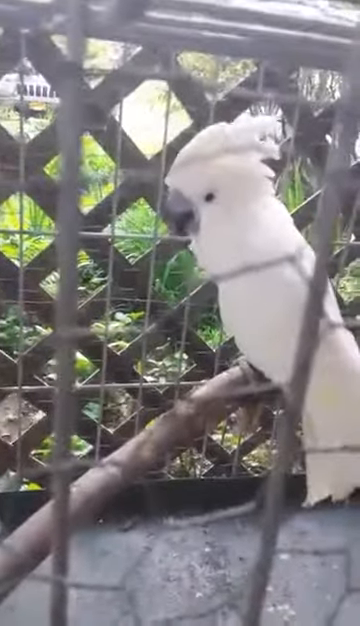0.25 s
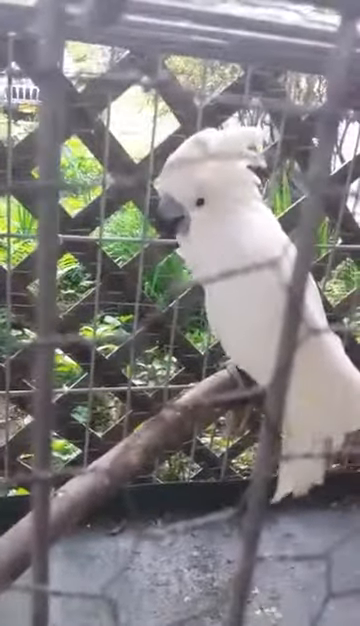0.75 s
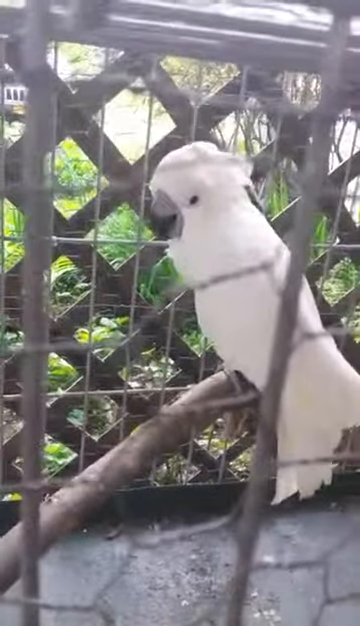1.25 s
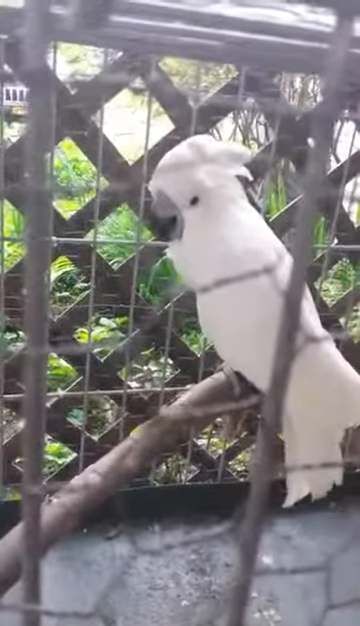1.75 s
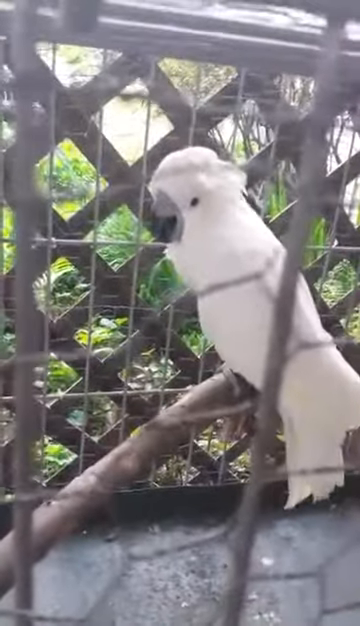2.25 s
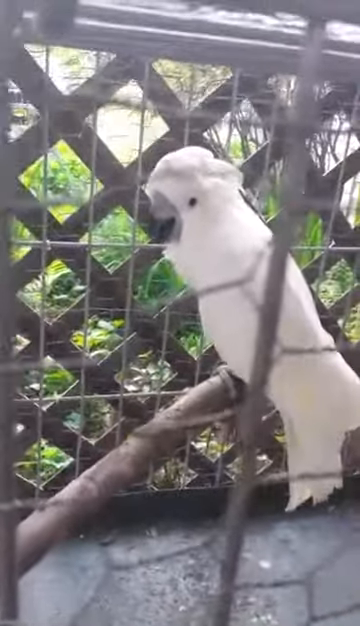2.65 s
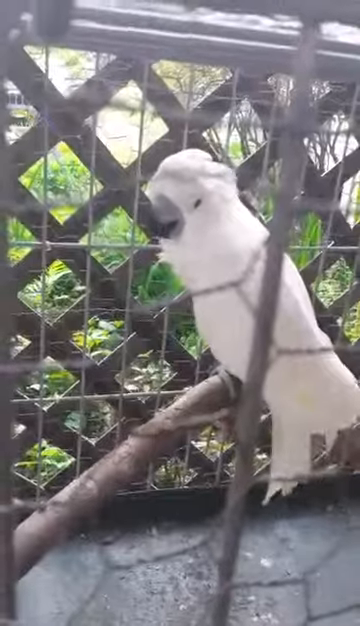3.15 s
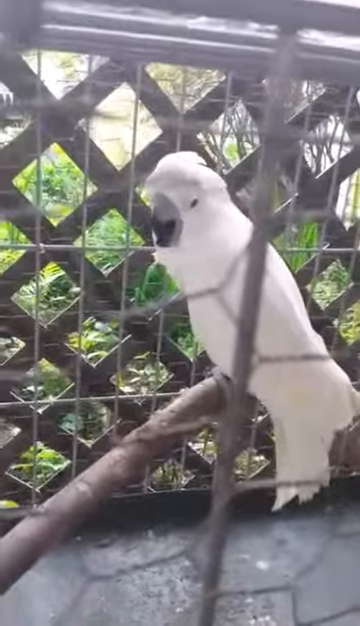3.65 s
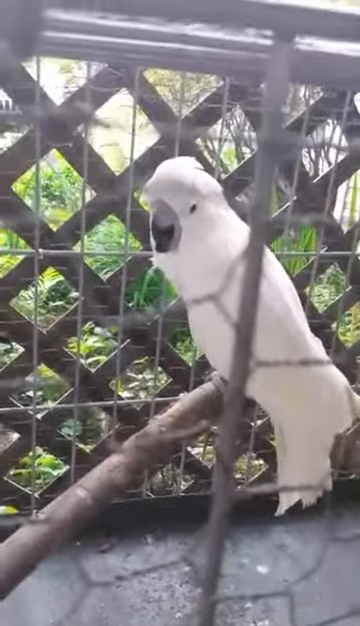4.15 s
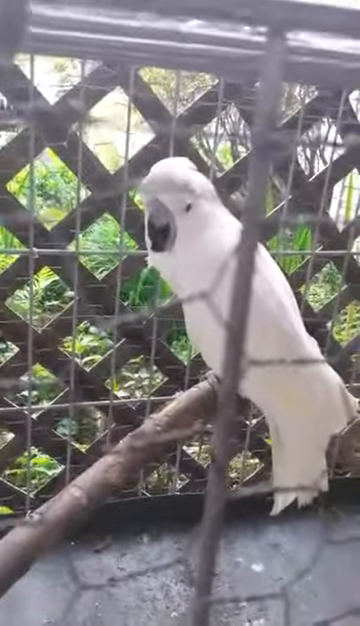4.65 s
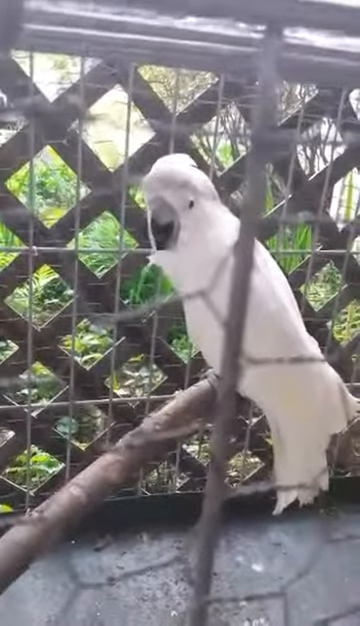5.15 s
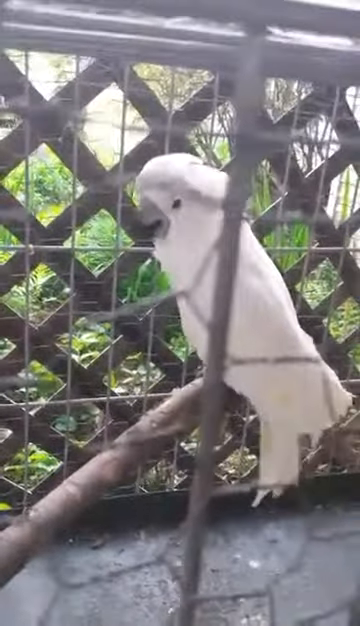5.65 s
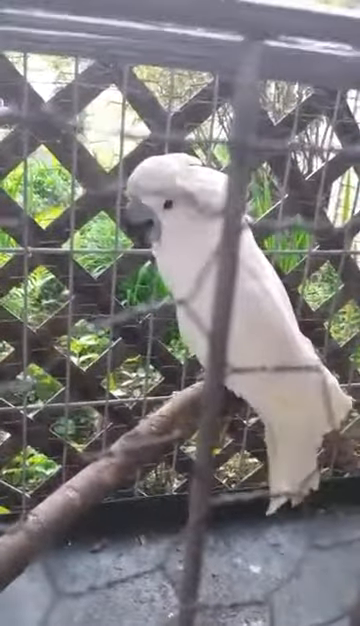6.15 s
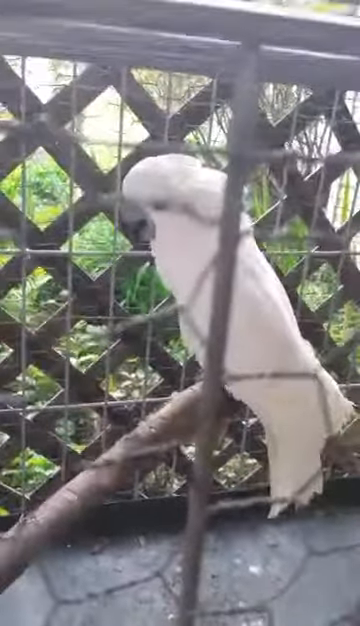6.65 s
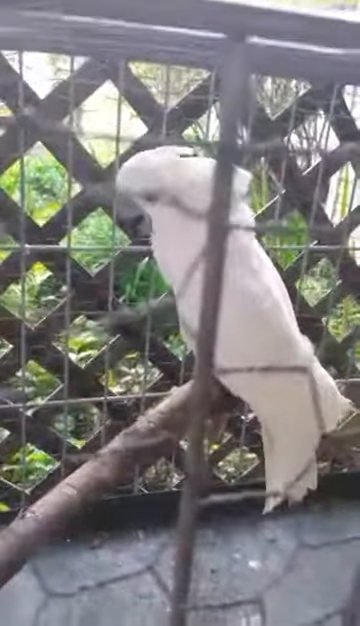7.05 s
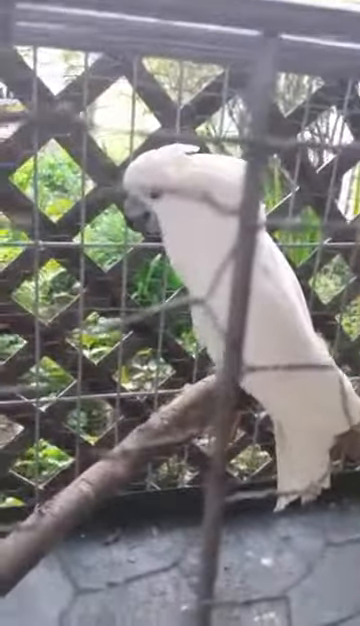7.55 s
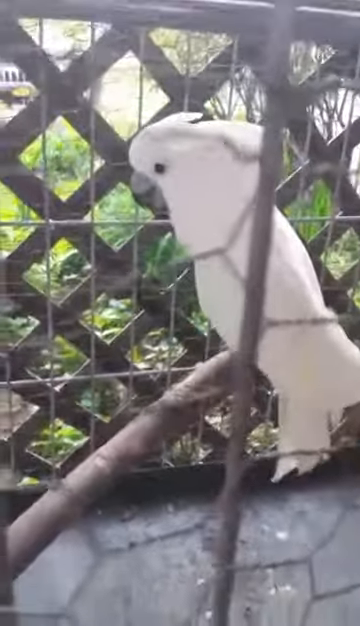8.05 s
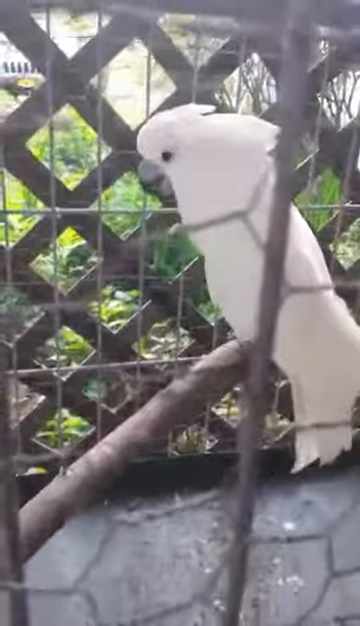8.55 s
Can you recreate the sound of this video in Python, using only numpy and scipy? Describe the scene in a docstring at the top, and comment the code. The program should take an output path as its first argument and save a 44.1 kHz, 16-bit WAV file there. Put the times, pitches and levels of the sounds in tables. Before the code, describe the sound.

Very loud, close cockatoo screeches, some long and wavering, break into rough rasp outdoors; faint bird whistles and low rumble fill the short gaps.

```python
"""Cockatoo in an outdoor aviary

A cockatoo screeches five long calls close to a phone with two unlike microphone ports.
Its syrinx flips between a clear stack of partials and a chaotic train of pulses, both shaped by the throat.
Lattice, roof and walls answer briefly with decaying noise. In the pauses small birds whistle far off,
as gliding sines, and the beak ticks once; filtered noise makes a low outdoor rumble and a faint hiss."""
import sys
import numpy as np
from scipy import signal
from scipy.fft import rfft, irfft, next_fast_len
from scipy.io import wavfile
from scipy.ndimage import uniform_filter1d, minimum_filter1d, map_coordinates

SR = 44100
rng = np.random.default_rng(int(sys.argv[2]) if len(sys.argv) > 2 else 0)


def wav_record(signal):
    """Record a signal, one row per channel, as 16-bit PCM in the file named by sys.argv[1]."""
    frames = np.transpose(np.atleast_2d(signal))
    bounded = np.clip(frames, -1, 1)
    # unit amplitude maps onto the largest positive 16-bit level
    quanta = np.round(bounded * 32767).astype(np.int16)
    wavfile.write(sys.argv[1], SR, quanta)


N = 388080  # samples

# Level of the outdoor rumble, ahead of the port balance. Each row: time in seconds, level in dB.
RUMBLE_LEVEL = [(0.0, -56.5), (4.07, -59), (4.97, -70), (5.02, -58), (7.97, -55), (8.04, -79), (8.7, -98),
                (8.8, -74.5)]
# Spectrum of the rumble. Each row: frequency in Hz, relative density in dB per Hz.
RUMBLE_SPECTRUM = [(15, -48.5), (25, -3), (49, 17), (81, -4), (155, 7.5), (390, -15.5), (461, -10),
                   (700, -9.5), (910, -64.5), (1540, -120)]
# Leaves and far noise, ahead of the ports. Each row: frequency in Hz, relative density in dB per Hz.
AIR_SPECTRUM = [(500, 4), (1000, -14), (2000, -2), (4000, -5.5), (6500, -10.5), (9000, -7.5),
                (12000, -28.5), (14500, -27.5)]
# Far whistles. Each row: start in seconds, length in seconds, first pitch in Hz, last pitch in Hz,
# left level in dB ahead of the flutter, left over right in dB.
FAR_WHISTLES = [(2.99, .11, 4355, 3955, -59, 23), (3.13, .09, 5440, 5183, -68, 27),
                (5.47, .19, 5320, 5270, -57, 13), (5.65, .09, 5136, 5830, -66.5, -7),
                (5.5, .05, 4260, 4100, -70, -7), (5.53, .16, 3660, 2717, -59.5, 5)]
# Decay of the yard. Each row: frequency in Hz, time to fall 60 dB in seconds.
YARD_DECAY = [(500, 0.52), (1300, 0.26), (2500, 0.18), (6000, 0.25), (12000, 0.12)]
# Colour of the left microphone port. Each row: frequency in Hz, gain in dB.
LEFT_PORT_GAIN = [(300, -32.5), (680, 8), (1300, 3.3), (2000, -6), (4000, 1), (6800, 7), (7600, -6),
                  (8500, -16), (11000, -25), (14500, -7)]
# Colour of the right microphone port. Each row: frequency in Hz, gain in dB.
RIGHT_PORT_GAIN = [(300, -24), (700, 1), (1300, -3), (2500, -17.5), (4000, -10.5), (6000, -5), (7400, 0),
                   (9000, -5), (14500, -2)]
# Ticks of the beak as it opens. Each row: time in seconds, left level in dB.
BEAK_TICKS = [(3.24, -51.5)]
# Resonances of windpipe and open beak. Each row: frequency in Hz, width in Hz, gain in dB.
THROAT_MODES = [(1268, 218, 3.5), (2427, 236, 8.5), (3457, 674, 1), (5143, 560, 2.5), (6153, 518, -3.5),
                (7517, 345, -2.5), (8940, 960, -7.5), (11450, 2400, -21)]
# Windpipe modes that the rasp rings harder. Each row: frequency in Hz, width in Hz, gain in dB.
RASP_MODES = [(2276, 330, -5), (3610, 300, -10), (5450, 120, -8), (6660, 340, 3)]
# The held part of each call, one list a call. Each row: time in seconds, pitch in Hz, level in dB.
HELD_CALLS = [
    [(0, 641, -19), (.04, 647.8, -15.5), (.165, 653.6, -6.5), (.249, 643, -20), (.28, 593, -21),
     (.334, 604.3, -20.5), (.43, 623.4, -15.5), (.509, 648.4, -12.5), (.539, 620.6, -18)],
    [(.957, 572, -16.5), (.978, 573, -10.5), (1.073, 650, -22), (1.117, 640.5, -8), (1.172, 624, -17.5),
     (1.252, 649.7, -16), (1.37, 631, -19), (1.55, 646.8, -16.5), (1.746, 668.6, -13.5),
     (1.941, 649.9, -15), (1.98, 642, -14.5), (2.02, 617.7, -17), (2.1, 658, -16), (2.19, 667.3, -12.5),
     (2.31, 656.2, -17), (2.424, 652, -10.5), (2.535, 661, -11.5), (2.6, 635.3, -20.5), (2.714, 646.3, -16),
     (2.76, 644, -12.5), (2.878, 640, -19)],
    [(3.302, 594.4, -14.5), (3.352, 599, -6.5), (3.417, 648.5, -24), (3.447, 644.5, -12),
     (3.542, 661, -15.5), (3.712, 666.9, -15.5), (3.906, 653.5, -16.5), (4.136, 670.3, -13.5),
     (4.365, 657.1, -16), (4.415, 664, -15.5), (4.465, 671.5, -12.5), (4.515, 660.5, -13.5),
     (4.53, 638.4, -12), (4.58, 653.9, -8), (4.654, 635.2, -13), (4.75, 628.7, -20), (4.959, 624.3, -13.5),
     (5.063, 603.6, -21), (5.198, 646, -12), (5.253, 627.7, -19.5), (5.303, 608, -36),
     (5.333, 600.5, -31.5)],
    [(5.775, 627, -18), (5.817, 620.2, -6), (5.89, 603.3, -19), (5.966, 670, -1.5), (6.02, 650.7, -21.5),
     (6.066, 641, -19), (6.116, 618.5, -20), (6.266, 581.7, -18.5), (6.42, 643.4, -4), (6.55, 618.3, -17.5),
     (6.59, 625.2, -15.5), (6.67, 615, -17.5), (6.73, 629.3, -18), (6.8, 615.3, -11.5), (6.934, 574.7, -25),
     (7.04, 550, -32.5), (7.1, 615.7, -21), (7.189, 650.5, -6.5), (7.31, 613.5, -26), (7.498, 586.3, -18.5)],
    [(7.972, 583.3, -15.5), (8.02, 588, -15), (8.127, 597.6, -14), (8.35, 602, -17), (8.53, 591, -14),
     (8.8, 577, -18)],
]
# Stretches where the pattern repeats only every second or third cycle, adding partials between.
# Each row: start in seconds, end in seconds, period in cycles, swing of timing in cycles.
PERIOD_SPLITS = [(0.319, 0.416, 3, 0.021), (1.28, 1.37, 3, 0.017), (2.047, 2.128, 2, 0.018),
                 (2.149, 2.263, 3, 0.0045), (2.61, 2.715, 3, 0.022), (4.52, 4.56, 2, 0.016),
                 (4.61, 4.688, 2, 0.041), (5.872, 5.928, 2, 0.028), (6.05, 6.15, 2, 0.023),
                 (6.321, 6.43, 2, 0.0098)]
# Stretches of clearer voice. Each row: start in seconds, end in seconds,
# share of rasp in dB ahead of cracks and unsteadiness.
CLEAR_STRETCHES = [(.255, .32, -20), (.32, .37, -10), (.42, .53, -25), (1.17, 1.29, -17), (1.29, 1.37, -12),
                   (1.41, 1.46, -11), (1.54, 1.58, -22), (2.01, 2.065, -24), (2.065, 2.125, -17),
                   (2.16, 2.275, -22), (2.555, 2.585, -22), (2.62, 2.7, -7), (2.7, 2.75, -20),
                   (3.42, 3.455, -22), (4.54, 4.6, -24), (4.6, 4.68, -20), (4.68, 4.77, -8),
                   (5.865, 5.92, -11), (6.03, 6.15, -14), (6.32, 6.47, -9), (6.54, 6.59, -19),
                   (6.7, 6.77, -22), (1.58, 1.97, -36), (2.275, 2.555, -40), (2.75, 2.85, -35),
                   (3.455, 4.515, -38), (6.59, 6.7, -35)]
# Brief roughness in a clear note. Each row: time in seconds, half width in seconds, rise of rasp in dB.
VOICE_CRACKS = [(1.63, 0.024, 11), (1.825, 0.028, 23.5), (3.55, 0.027, 21), (3.8, 0.012, 15.5),
                (3.88, .02, 14.5), (4.24, 0.058, 21.5), (4.414, 0.013, 29)]
# Balance of the voice. Each row: time in seconds, share of the low tone in dB at the usual level,
# brightness (high over middle partials) in dB.
VOICE_BALANCE = [(0, -13, -5.5), (0.499, -11, -5), (.95, -11.5, 0), (1.3, -11.5, -7), (1.601, -10.5, -4.5),
                 (1.719, -9.5, 3.5), (2.031, -9.5, -6.5), (2.26, -11.5, 2.5), (2.42, -5, -5),
                 (2.531, -6, 8), (2.621, -10, -7), (2.76, -8.5, -2), (3.299, -12.5, -4.5),
                 (3.54, -12.5, 7.5), (3.9, -7.5, 4.5), (4.14, -12, -7), (4.36, -10, 1), (4.498, -12, -8),
                 (5.201, -15, -6.5), (5.801, -12.5, -3.5), (6.501, -12.5, -3.5), (6.619, -9.5, 2.5),
                 (7.04, -13.5, -4), (7.5, -12.5, -2), (7.95, -10.5, 2), (8.8, -12.5, 3.5)]

LEFT_LAG_S = 7 / SR
# A call swells from this far under its first level and pitch, then dies away.
ATTACK_S, ATTACK_DB, SCOOP_HZ = .04, -17.5, -25.5
RELEASE_S, RELEASE_DB = .09, -49
RASP_DB = -2.5  # usual share of rasp
FLIP_S = 0.0099  # time scale of a flip to the clear voice and back
UNSTEADY_DB = 4  # swing of the rasp share, smaller as rasp takes over
USUAL_DB = -15  # call level at which the low tone keeps its listed share
LOW_DROP = 0.55  # dB the low tone's share falls for each dB of call level over the usual
BAND_TOP_HZ = 14490


def amp(db):
    """Decibels to amplitude."""
    return 10 ** (np.asarray(db) / 20)


def unit(x):
    """Scale to an RMS of one over all channels together."""
    return x / np.sqrt(np.mean(x ** 2) + 1e-20)


def along(points, hz):
    """Read (Hz, value) points along a log frequency axis."""
    f, values = np.transpose(points)
    return np.interp(np.log(hz + 1), np.log(f + 1), values)


def over_time(points):
    """Join timed rows with straight lines: one curve for each column after the time."""
    times, *columns = np.transpose(points)
    return [np.interp(np.arange(N) / SR, times, column) for column in columns]


def wobble(rate, count=1):
    """Smooth random curves with `rate` knots a second."""
    coarse = np.arange(0, N + 64, 64)
    knots = rng.standard_normal((count, int(N * rate / SR) + 4))
    curves = [map_coordinates(row, [coarse * rate / SR]) for row in knots]
    return np.array([np.interp(np.arange(N), coarse, curve) for curve in curves])


def filtered(x, response):
    """Multiply the spectrum of x by a complex response of frequency."""
    size = next_fast_len(N + SR // 2)
    return irfft(rfft(x, size) * response(np.fft.rfftfreq(size, 1 / SR)), size)[..., :N]


def step(x, edge, width):
    """A smooth rise from 0 to 1, along frequency or time."""
    return .5 + .5 * np.tanh((x - edge) / width)


def resonance(f, centre_hz, width_hz, db):
    """One damped mode: a peak of the given gain, with its phase turn."""
    damping = 1j * f * width_hz
    return amp(db) * damping / (centre_hz ** 2 - f * f + damping)


def ports(f):
    """Each microphone port has its own colour, and the left one hears later."""
    colour = amp([along(LEFT_PORT_GAIN, f), along(RIGHT_PORT_GAIN, f)])
    return colour * np.exp([[-2j * np.pi * LEFT_LAG_S], [0]] * f)


def outdoors():
    """A lumpy low rumble, much alike at both ports, and a faint hiss unrelated between them."""
    common, difference = filtered(rng.standard_normal((2, N)), lambda f: amp(along(RUMBLE_SPECTRUM, f)))
    lumps = amp(4.5 * wobble(8)[0] + 2.5 * wobble(20)[0])
    rumble = unit(lumps * np.array([common + .3 * difference, common - .3 * difference]))
    rumble = rumble * amp([[2], [-2]])  # left port stronger
    level_db, = over_time(RUMBLE_LEVEL)
    hiss = filtered(rng.standard_normal((2, N)),
                    lambda f: amp(along(AIR_SPECTRUM, f)) * ports(f) * step(f, 300, 68))
    hiss_level = amp(-62.5 + 3.6 * wobble(26, count=2))
    return amp(level_db) * rumble + hiss_level * unit(hiss)


def far_whistles():
    """Small birds far off: gliding sines whose pitch and level flutter, blurred by distance."""
    out = np.zeros((2, N))
    for start_s, length_s, first_hz, last_hz, db, pan_db in FAR_WHISTLES:
        u = np.linspace(0, 1, int(length_s * SR))
        flutter = np.interp(u, np.linspace(0, 1, 12), rng.standard_normal(12))
        pitch_hz = first_hz + (last_hz - first_hz) * u + 45 * flutter
        tone = np.sin(2 * np.pi * np.cumsum(pitch_hz) / SR)
        swell = np.sqrt(np.sin(np.pi * u)) * amp(4.9 * flutter[::-1])
        out[:, round(start_s * SR):][:, :len(u)] += amp([[db], [db - pan_db]]) * swell * tone
    return out


def yard(x):
    """Lattice, roof and walls answer with noise; each frequency dies at its own speed."""
    hz, t, z = signal.stft(rng.standard_normal((2, SR // 2)), SR, nperseg=256)
    decay = amp(-60 * t / along(YARD_DECAY, hz)[:, None])
    tail = signal.istft(z * decay, SR, nperseg=256)[1]
    delayed = np.pad(x, ((0, 0), (150, 0)))  # samples before the answer begins
    return signal.fftconvolve(delayed, tail / np.linalg.norm(tail[0]), axes=1)[:, :N]


def beak_tick():
    """The beak opening: a burst of treble-heavy noise that falls 60 dB in 5 ms, mostly at the left port."""
    out = np.zeros((2, N))
    t = np.arange(400) / SR
    for start_s, db in BEAK_TICKS:
        click = amp(-60 * t / .005) * np.diff(rng.standard_normal(len(t) + 1))
        out[:, round(start_s * SR):][:, :len(t)] += amp([[db], [db - 29]]) * click
    return out


def throat(f):
    """Resonances of windpipe and open beak, in alternate sign; little is radiated below the pitch."""
    modes = sum((-1) ** k * resonance(f, *mode) for k, mode in enumerate(THROAT_MODES))
    return modes * step(f, 374, 90)


def split(cycles):
    """Closures come early and late in a pattern of two or three cycles."""
    t = np.arange(N) / SR
    shift = 0
    for start_s, end_s, period, swing in PERIOD_SPLITS:
        active = step(t, start_s, 0.016) - step(t, end_s, 0.016)
        shift = shift + swing * active * np.sin(2 * np.pi * cycles / round(period) + 1)
    return cycles + shift


def clear(cycles, odd_db, drift_db):
    """Regular vibration: strong and weak closures alternate, so odd partials are weaker; each drifts."""
    total = 0
    for k in range(1, 23):
        level = amp(odd_db * (k % 2) + drift_db * wobble(4.046)[0])
        total = total + level * np.cos(2 * np.pi * k * cycles)
    return total


def rasp(cycles, wander_hz, jitter_s, scatter_db, clump_db, memory):
    """Chaotic vibration: two closures a cycle, uneven in time and size, ringing the windpipe.
    The unevenness partly repeats after six closures, which leaves short tonal strands in the noise."""
    beats = 2 * (cycles + wander_hz * np.cumsum(wobble(160)[0]) / SR)
    whole = np.arange(int(beats[0]) + 1, int(beats[-1]))
    keep = np.clip(memory, 0, .95)
    uneven = signal.lfilter([np.sqrt(1 - keep ** 2)], [1, 0, 0, 0, 0, 0, -keep],
                            rng.standard_normal((len(whole), 2)), axis=0)
    at = np.interp(whole, beats, np.arange(N)) + jitter_s * SR * uneven[:, 0]
    at = np.clip(at, 8, N - 9)[:, None]
    # windowed sinc pulses place each closure between samples
    taps = at.astype(int) + np.arange(-7, 9)
    shape = np.sinc(taps - at) * np.cos(np.pi * (taps - at) / 18) ** 2
    sizes = amp(scatter_db * uneven[:, 1:])
    pulses = np.bincount(taps.ravel(), (shape * sizes).ravel(), N)
    clumped = pulses * amp(clump_db * wobble(90)[0])
    return filtered(clumped, lambda f: 1 + sum(resonance(f, *mode) for mode in RASP_MODES))


def shaped(source, low_db, bright_db):
    """Through throat and ports as low tone and upper partials; the beak's opening changes their balance."""
    def band(window):
        return unit(filtered(source, lambda f: throat(f) * ports(f) * window(f)))
    low = band(lambda f: 1 - step(f, 2040, 320))
    middle = band(lambda f: step(f, 1740, 140) - step(f, 4400, 370))
    high = band(lambda f: step(f, 4420, 270))
    upper = (middle + amp(bright_db) * high) / np.hypot(1, amp(bright_db))
    return np.array([amp(low_db) * low, np.sqrt(1 - amp(low_db) ** 2) * upper])


def rasp_share_db():
    """How far the syrinx leans to chaos: flips to clear stretches, cracks, and an unsteadiness that fades as
    the rasp takes over."""
    t = np.arange(N) / SR
    share_db = RASP_DB
    for start_s, end_s, db in CLEAR_STRETCHES:
        share_db = share_db + (db - RASP_DB) * (step(t, start_s, FLIP_S) - step(t, end_s, FLIP_S))
    for at_s, width_s, db in VOICE_CRACKS:
        share_db = share_db + db * np.exp(-((t - at_s) / width_s) ** 2)
    return share_db + UNSTEADY_DB * wobble(22)[0] * (1 - amp(np.minimum(share_db, 0)))


def cockatoo():
    """The close calls: clear and chaotic vibration of one syrinx, mixed; silent between calls."""
    t = np.arange(N) / SR
    calls = []
    for held in HELD_CALLS:
        first_s, first_hz, first_db = held[0]
        last_s, last_hz, last_db = held[-1]
        attack = (first_s - ATTACK_S, first_hz + SCOOP_HZ, first_db + ATTACK_DB)
        release = (last_s + RELEASE_S, last_hz, last_db + RELEASE_DB)
        calls.append([attack, *held, release])
    pitch_hz, level_db = over_time(np.vstack(calls))
    sounding = sum((t >= call[0][0]) & (t <= call[-1][0]) for call in calls)
    cycles = np.cumsum(pitch_hz * (1 + 0.00088 * wobble(20)[0])) / SR

    low_db, bright_db = over_time(VOICE_BALANCE)
    # the low tone takes little part in surges
    low_db = np.minimum(low_db - LOW_DROP * np.maximum(level_db - USUAL_DB, -5), -1)
    tone = shaped(clear(split(cycles), odd_db=-4.0, drift_db=2.5), low_db, bright_db)
    chaos = rasp(cycles, wander_hz=12, jitter_s=8e-5, scatter_db=4.0, clump_db=2.0, memory=0.757)
    chaos = shaped(chaos, low_db, bright_db)

    # the low tone holds on better than the upper partials
    share = amp(np.minimum(rasp_share_db(), 0) + [[[-1.5]], [[0]]])
    tone_share = (1 - share) ** 2  # the clear tone dies as chaos takes over
    voice = (tone_share * tone + share * chaos) / np.hypot(share, tone_share)
    return voice.sum(axis=0) * amp(level_db) * uniform_filter1d(sounding * 1., 200)


def scene():
    """The bird close by, small sounds, the answer of the yard to both, and the outdoor bed."""
    small = far_whistles() + beak_tick()
    bird = cockatoo()
    return outdoors() + yard(amp(-8.5) * bird + amp(-6.5) * small) + small + bird


def record(dry):
    """A fast limiter holds most peaks, the highest clip at full scale; deep bass and the top are cut."""
    needed = np.minimum(1, .9 / (np.abs(dry) + 1e-9))
    gain = uniform_filter1d(minimum_filter1d(needed, size=221, axis=1), size=221, axis=1)
    held = dry * gain ** .68  # only part of the needed gain reduction
    clipped = held / (1 + held ** 10) ** (1 / 10)
    return filtered(clipped, lambda hz: step(hz, 63, 37) * (hz < BAND_TOP_HZ))


dry = scene()
out = record(dry)
wav_record(out)
```